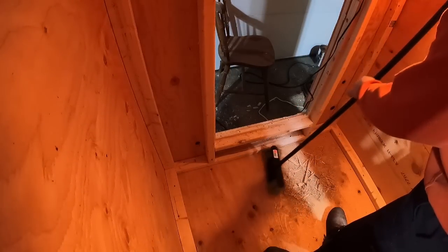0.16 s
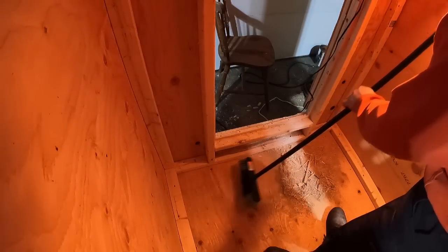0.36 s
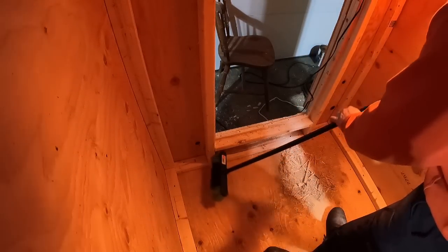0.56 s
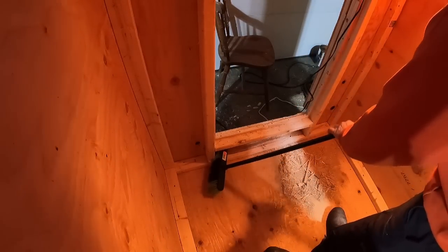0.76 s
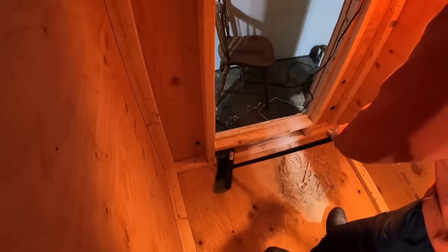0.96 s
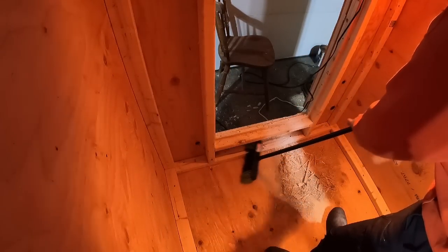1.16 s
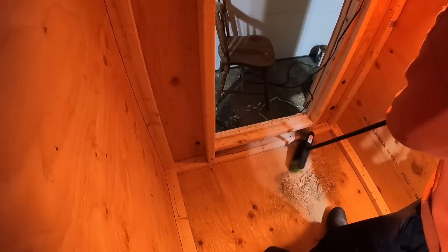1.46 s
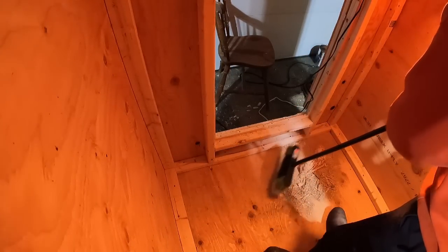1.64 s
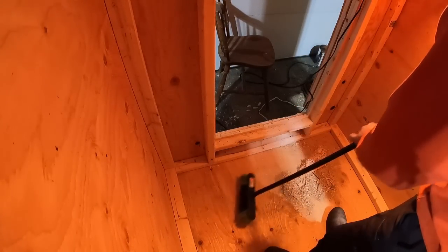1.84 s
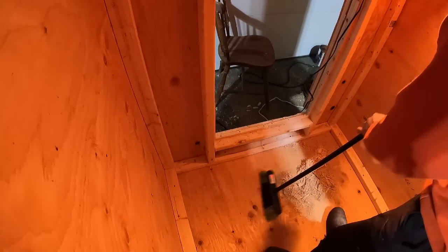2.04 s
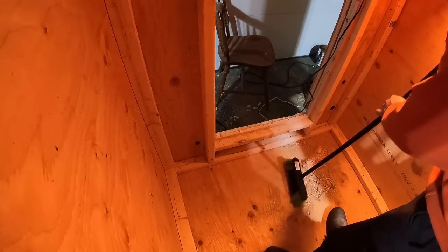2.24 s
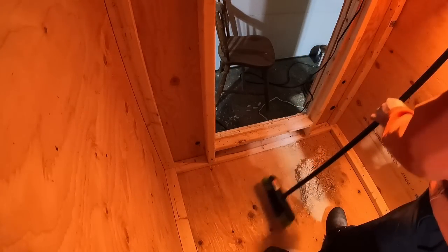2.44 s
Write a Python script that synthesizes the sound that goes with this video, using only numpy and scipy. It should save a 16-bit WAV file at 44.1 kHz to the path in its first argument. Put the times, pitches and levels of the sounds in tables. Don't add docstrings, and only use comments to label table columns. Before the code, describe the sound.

A broom sweeps wood shavings over a hollow plywood floor with knocks and brisk bristly strokes

```python
import sys
import numpy as np
from scipy import signal
from scipy.fft import rfft, irfft
from scipy.io import wavfile

SR = 44100
rng = np.random.default_rng(int(sys.argv[2]) if len(sys.argv) > 2 else 0)


def output_pcm(signal):
    pcm = np.clip(np.atleast_2d(signal).T, -1, 1) * 32767
    wavfile.write(sys.argv[1], SR, np.round(pcm).astype(np.int16))


def elevation(decibels):
    levels = np.asarray(decibels, float)
    return 10 ** (levels / 20)


N = 114660
T = np.arange(N) / SR

# (time [s], speed as hiss level [dB], pressure as drag level [dB])
STROKES = [(.04, -59, -55.5), (.11, -47.5, -36), (.33, -49.5, -50), (0.389, -64, -59), (0.561, -83, -73),
           (0.722, -84, -85), (.75, -70.5, -61.5), (1.0, -52.5, -44.5), (1.11, -52, -39.5),
           (1.16, -53, -43), (1.38, -43.5, -42), (1.59, -44.5, -45), (1.77, -64, -51), (1.83, -76, -72),
           (2.099, -81, -82.5), (2.19, -41, -43.5), (2.428, -41.5, -43.5), (2.528, -68.5, -57)]
# (frequency [Hz], level [dB], T60 [s])
BOARD_MODES = [(48, 1, 0.48), (77.2, -5.5, .8), (100, -6, .6), (125.7, -6, .45), (176.6, 1.5, .6),
               (200, 0.5, 0.56), (255.8, -9.5, 0.44), (302.7, -1, 0.54), (344.5, -0.5, 0.43), (430, -1, .4),
               (518, -9, 0.24), (601.5, -7.5, .3), (723.6, 1.5, 0.18), (817, -2.5, .3)]
BRISK_DB = -45


def evened(x):
    return x / np.sqrt(np.mean(x ** 2) + 1e-20)


def colour(x, points):
    size = x.shape[-1]
    hz, db = np.transpose(points)
    bins_hz = np.fft.rfftfreq(size, 1 / SR)
    gain = elevation(np.interp(np.log(bins_hz + 1), np.log(hz + 1), db))
    return irfft(rfft(x) * gain, size)


def drift(hz):
    lowpass = signal.butter(2, hz, fs=SR, output="sos")
    return evened(signal.sosfilt(lowpass, rng.standard_normal(N)))


def add(mix, s, sound):
    part = mix[round(max(s, 0) * SR):][:len(sound)]
    part += sound[:len(part)]


def air():
    # (frequency [Hz], level [dB])
    air_curve = [(20, -13), (120, -15.5), (200, -6.5), (400, -15), (800, -38.5), (1300, -27), (6700, -33.5),
                 (13000, -50), (14500, -83)]
    tone = elevation(-64.5) * evened(colour(rng.standard_normal(N), air_curve))
    s, _, press_db = np.transpose(STROKES)
    effort_db = np.interp(T, s, press_db) - BRISK_DB
    rumble = evened(colour(rng.standard_normal(N), [(15, -10), (30, 0), (70, -25), (200, -70)]))
    rumble_db = -54 + 1.8 * drift(8) + 0.35 * effort_db
    return tone + elevation(rumble_db) * rumble


def room(x):
    t60, echoes_per_s, first_s = 0.14, 3000, .003
    u = np.arange(SR // 4) / SR
    signs = rng.choice([-1., 1.], (3, len(u)))
    struck = rng.random((3, len(u))) < echoes_per_s / SR
    tails = signs * struck * (u > first_s) * elevation(-60 * u / t60)
    tails = tails / np.linalg.norm(tails, axis=1, keepdims=True)
    turn = T * 3 + np.arange(3)[:, None] / 3
    fed = x * np.cos(np.pi * turn) * np.sqrt(2 / 3)
    return signal.fftconvolve(fed, tails, axes=1)[:, :N].sum(0)


def strike(centre_hz, share, spread, cycles, soft_s, haze_db):
    u = np.arange(SR // 2) / SR
    hz, db, t60 = np.transpose(BOARD_MODES)[:, :, None]
    luck = .5 + rng.random((len(BOARD_MODES), 1))
    near = np.exp(-.5 * (np.log2(hz / centre_hz) / spread) ** 2) * luck * elevation(db)
    decay = np.exp(-np.log(1000) * u / (t60 * share))
    modes = -(near * decay * np.sin(2 * np.pi * hz * u)).sum(0)
    modes = modes / np.sqrt((near ** 2).sum() / 2 + .015)

    bins_hz = np.fft.rfftfreq(len(u), 1 / SR) + 1
    band = np.exp(-.5 * (np.log2(bins_hz / centre_hz) / spread) ** 2) / np.sqrt(bins_hz)
    haze = evened(irfft(rfft(rng.standard_normal(len(u))) * band))
    haze_t60 = 0.55 * share
    haze = haze * elevation(haze_db - 60 * u / haze_t60)

    rise_s = cycles / centre_hz + soft_s
    onset = np.sin(np.pi / 2 * np.minimum(u / rise_s, 1)) ** 2
    return onset * (modes + haze)


def knocks():
    # (time [s], level [dB], centre [Hz], share of the board T60 [ratio], spread [octaves])
    head_blows = [(.0, -22, 600, .24, .37), (.0104, -13.5, 230, .95, .5), (.013, -15.5, 480, .95, .4),
                  (.0104, -15, 430, .12, .15), (.009, -16, 1450, .1, .3), (.012, -22, 1080, .6, .4),
                  (.047, -21, 345, .5, .15), (.025, -25, 85, .9, .3), (.08, -25, 175, .6, .12),
                  (.13, -27, 135, 1, .3), (2.086, -31, 1300, .4, .08), (2.087, -30, 1950, .4, .1),
                  (2.096, -34, 970, .5, .08), (2.0962, -23, 200, .22, .55), (2.104, -28, 470, .8, .45),
                  (2.1185, -22.5, 205, .25, .12), (2.105, -30, 75, .9, .3), (2.5562, -40.5, 515, .3, .12),
                  (2.570, -38, 480, 1.1, .2), (2.564, -47, 1400, .4, .1), (2.568, -41, 200, .5, .3),
                  (2.581, -30, 135, .8, .15), (2.588, -47, 1600, .6, .5)]
    # (time [s], level [dB], centre [Hz], share of T60 [ratio], spread [octaves])
    soft_bumps = [(.305, -32, 81, .35, .4), (.419, -38, 70, .65, .5), (.455, -38, 60, .33, .4),
                  (.471, -44, 110, .45, .5), (.43, -56, 520, .6, .3), (.539, -50, 130, .5, .5),
                  (.6, -43, 52, .6, .4), (.656, -43.5, 48, .3, .4), (.86, -49, 185, .5, .1),
                  (.9, -48, 44.4, .72, .4), (1.0, -48.5, 60.6, .6, .4), (1.052, -43, 330, .2, .2),
                  (1.058, -38, 580, .9, .15), (1.068, -42, 850, .3, .12), (1.072, -28.5, 303, .3, .06),
                  (1.11, -44, 350, .4, .2), (1.115, -36, 178, .4, .08), (1.13, -43, 75, .6, .2),
                  (1.166, -29, 96, .6, .12), (1.21, -39, 190, .3, .15), (1.25, -40, 100, .5, .15),
                  (1.285, -38, 100, .25, .2), (1.315, -43, 180, .3, .2), (1.575, -39, 305, .5, .12),
                  (1.59, -46, 200, .4, .1), (1.635, -45, 100, .4, .3), (1.64, -41, 215, .6, .15),
                  (1.695, -44, 290, .4, .15), (1.715, -38, 190, .3, .15), (1.736, -33, 303, .4, .07),
                  (1.75, -42, 80, .2, .4), (1.79, -52, 330, 1.1, .5), (2.031, -52, 190, .4, .15),
                  (2.219, -41, 115, .8, .2), (2.35, -43, 110, 1, .3), (2.405, -43, 900, .24, .4),
                  (2.46, -45, 320, .44, .2), (2.465, -45, 100, .5, .3)]
    # (rise [cycles], extra rise [s], haze level [dB])
    hard, soft = (.2, .0002, -5), (.46, .006, -5)
    out = np.zeros(N)
    for hits, contact in [(head_blows, hard), (soft_bumps, soft)]:
        for s, db, centre_hz, share, spread in hits:
            add(out, s, elevation(db) * strike(centre_hz, share, spread, *contact))
    return out


def ticks():
    ticks_per_s, size_spread_db, clump_db = 9000, 1.5, 0.3
    size = elevation(size_spread_db * rng.exponential(1, N)) * rng.choice([-1., 1.], N)
    clicks = size * (rng.random(N) < ticks_per_s / SR)
    return evened(clicks) * elevation(clump_db * drift(60))


def head():
    # (frequency [Hz], bandwidth [Hz], level [dB])
    head_modes = [(738, 35, 3), (1190, 200, -5.5), (1680, 130, -4.5), (2330, 64, -15)]
    # (time [s], level [dB])
    trail = [
        (.72, -92.5),
        (.745, -61),
        (0.981, -44),
        (1.05, -54),
        (1.4, -44.5),
        (1.6, -82),
        (1.8, -94),
    ]
    u = np.arange(SR // 8) / SR
    ring = np.zeros(len(u))
    for hz, width, db in head_modes:
        decay = np.exp(-np.pi * width * u)
        ring += elevation(db) * np.sqrt(width) * decay * np.sin(2 * np.pi * hz * u)
    s, trail_db = np.transpose(trail)
    return evened(signal.fftconvolve(ticks(), ring)[:N]) * elevation(np.interp(T, s, trail_db))


def scuffs():
    # (time [s], level [dB], rise [s], T60 [s], treble tilt [dB per octave])
    bursts = [(.006, -42, .008, .16, -1), (.47, -59, 0.0284, 0.26, -3.5), (0.654, -67.5, .01, 0.29, -2),
              (0.742, -59, 0.014, .4, -7), (0.861, -52, 0.015, 0.42, -7), (0.972, -48, 0.028, 0.35, -4.5),
              (1.075, -44, .02, 0.19, -6.5), (2.071, -55.5, 0.0061, .2, -3.5),
              (2.094, -25, 0.0095, 0.27, -5), (2.418, -45, 0.019, 0.17, -16), (2.585, -55, .012, .4, -3),
              (2.597, -49.5, 0.011, .2, -18)]
    # (frequency [Hz], level [dB])
    slap_curve = [(150, -21), (500, -6), (1300, -2.5), (2000, 1.5), (4500, -2), (7000, -7), (11000, -20.5),
                  (15500, -26.5)]
    out = np.zeros(N + 2 * SR)
    u = np.arange(-2048, 14336) / SR
    grain = np.pad(colour(ticks(), slap_curve), SR, "wrap")
    for s, db, rise, t60, tilt_db in bursts:
        swell = np.where(u < 0, np.exp(-(u / rise) ** 2), elevation(-60 * np.maximum(u, 0) / t60))
        at = 1 + s + u[0]
        clicks = grain[round(at * SR):][:len(u)]
        clicks = evened(colour(clicks, [(1000, 0.02), (16000, 4 * tilt_db)]))
        add(out, at, elevation(db) * swell * clicks)
    return out[SR:SR + N]


def bristles():
    # (frequency [Hz], level [dB])
    hiss_curve = [(300, 3), (800, -5), (1500, -1.5), (4000, 1), (7000, -5), (10000, -13.5), (12500, -18),
                  (15500, -36)]
    # (frequency [Hz], level [dB])
    push_curve = [(40, -22.5), (100, -14.5), (180, 3), (400, 5), (730, 0), (1100, -0.5), (1800, -7),
                  (3500, -35)]
    s, speed_db, press_db = np.transpose(STROKES)
    speed_db, press_db = np.interp(T, s, speed_db), np.interp(T, s, press_db)

    hiss = evened(colour(ticks(), hiss_curve))
    top = colour(hiss, [(3000, -40.5), (9000, -8), (13000, -0.5)])
    top_db = 0.58 * (speed_db - BRISK_DB)
    hiss = hiss - top + top * elevation(top_db)

    u = np.arange(SR // 4) / SR
    ring = np.zeros(len(u))
    for hz, db, t60 in BOARD_MODES:
        damped_t60 = t60 * 0.22
        ring += elevation(db - 60 * u / damped_t60) * np.sin(2 * np.pi * hz * u) / np.sqrt(t60)
    push = colour(ticks(), push_curve)
    drag = evened(signal.fftconvolve(push, ring)[:N]) + elevation(3) * evened(push)
    return hiss * elevation(speed_db) + evened(drag) * elevation(press_db)


def scene():
    # (frequency [Hz], side minus mid [dB])
    wall_width = [(60, -29), (200, -24), (400, -18.5), (700, -11.5), (2400, -9), (4400, -10), (8000, -6.5),
                  (13000, -1.5)]
    # (frequency [Hz], level [dB])
    lean_left = [(300, -48), (1000, -25), (4000, -17), (9000, -14), (11000, -45)]
    # (frequency [Hz], level [dB])
    lean_right = [(10500, -50), (11800, -15), (15000, -15)]
    broom = bristles() + scuffs() + head()
    mid = broom + elevation(-10) * room(broom) + knocks() + air()
    margin = (0, 4096)
    walls = colour(np.pad(room(mid), margin, "linear_ramp"), wall_width)[:N]
    left = colour(np.pad(mid, margin, "linear_ramp"), lean_left)[:N]
    side = walls + left - colour(mid, lean_right)
    return np.array([mid + side, mid - side])


def low_pass(x):
    return signal.sosfilt(signal.butter(12, 15660, fs=SR, output="sos"), x)


def record(dry):
    # (time [s], level [dB])
    opening = [
        (0, -81),
        (1.0, -38.5),
        (1.25, -12.5),
        (1.501, -9.5),
        (1.85, -3),
    ]
    split_hz, edge_hz = 11100, 15640
    mid, side = dry.mean(0), (dry[0] - dry[1]) / 2
    s, db = np.transpose(opening)
    low = signal.sosfiltfilt(signal.butter(8, split_hz, fs=SR, output="sos"), side)
    side = side - low + low * elevation(np.interp(T, s, db))
    both = np.array([mid + side, mid - side])
    both = signal.oaconvolve(both, signal.firwin(511, edge_hz, fs=SR)[None], "same")
    return low_pass(both)


dry = scene()
out = record(dry)
output_pcm(out)
```